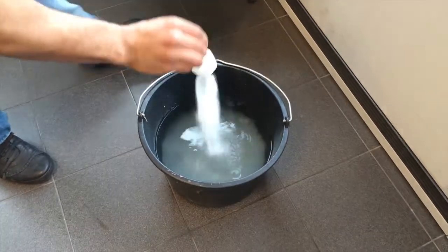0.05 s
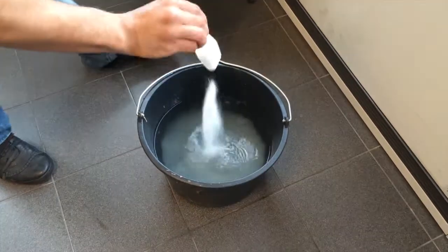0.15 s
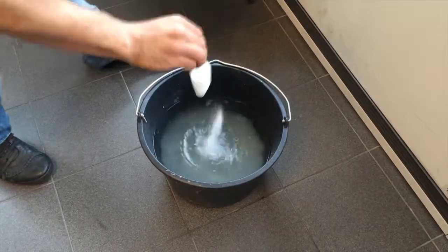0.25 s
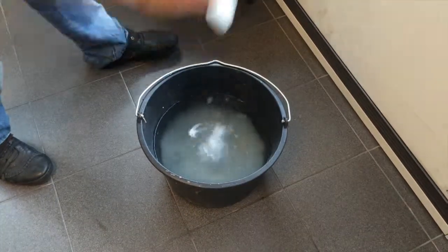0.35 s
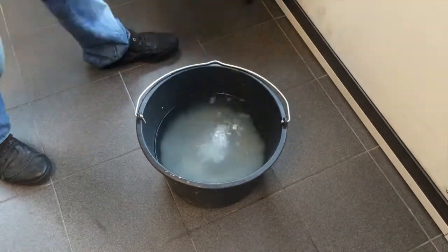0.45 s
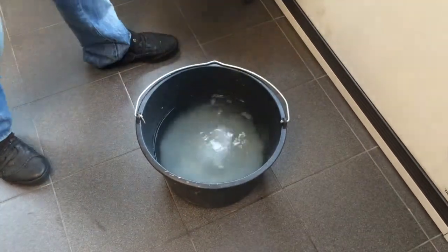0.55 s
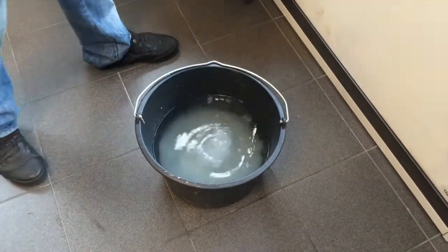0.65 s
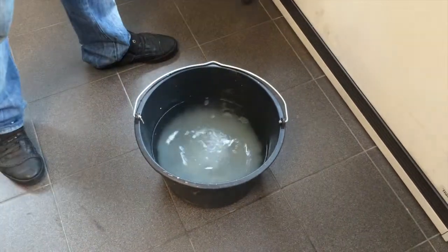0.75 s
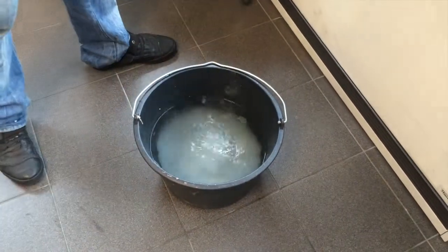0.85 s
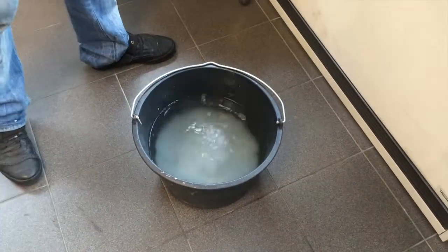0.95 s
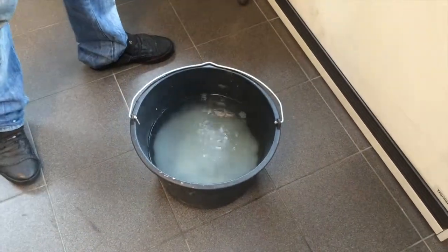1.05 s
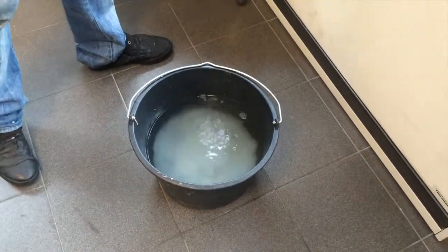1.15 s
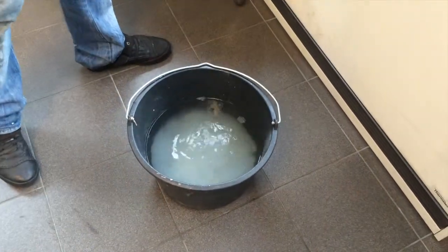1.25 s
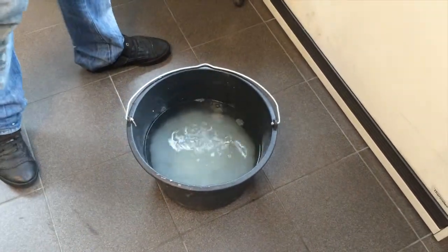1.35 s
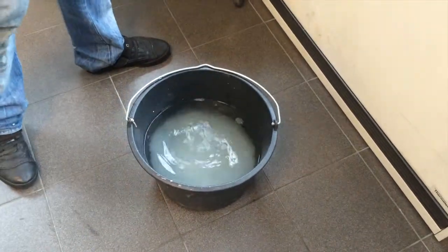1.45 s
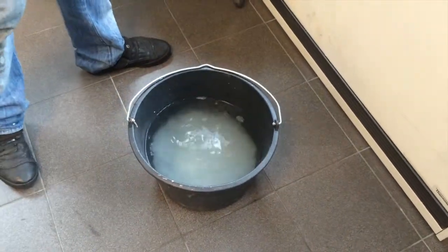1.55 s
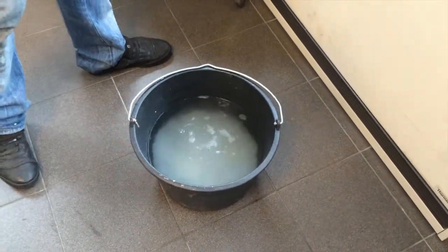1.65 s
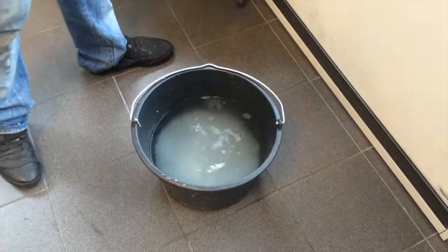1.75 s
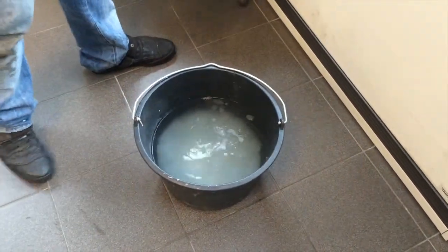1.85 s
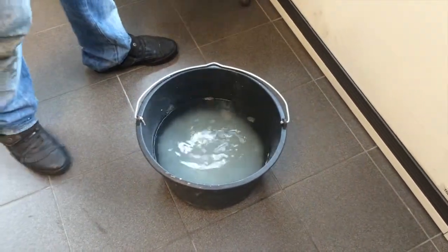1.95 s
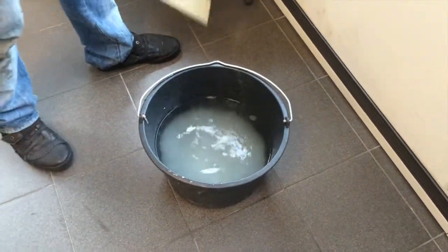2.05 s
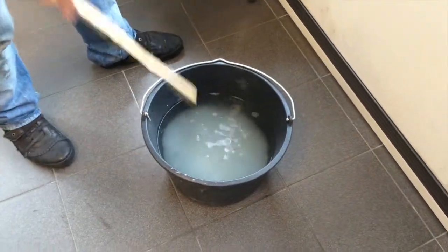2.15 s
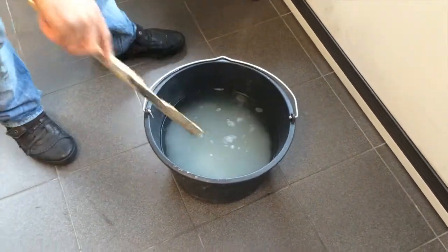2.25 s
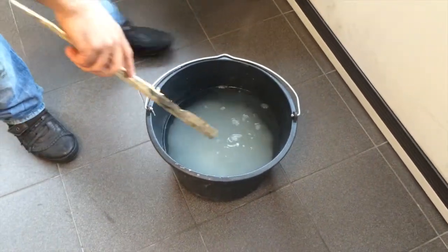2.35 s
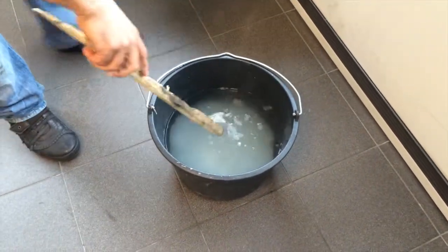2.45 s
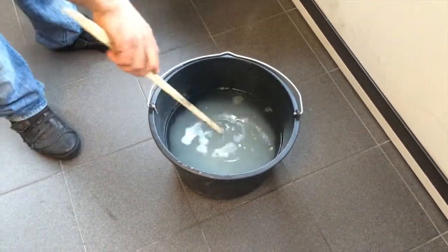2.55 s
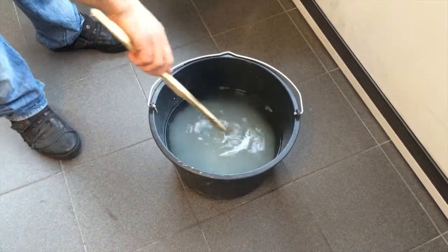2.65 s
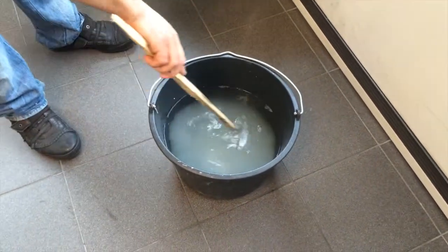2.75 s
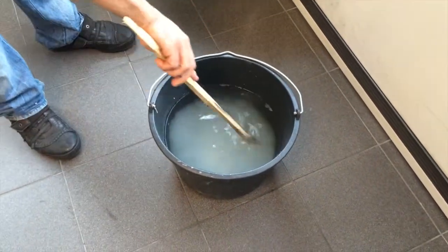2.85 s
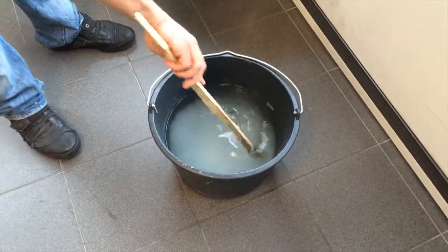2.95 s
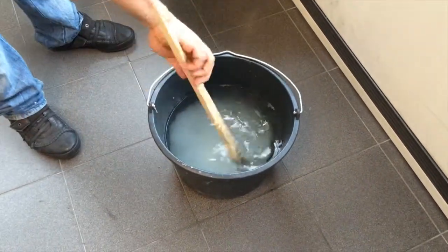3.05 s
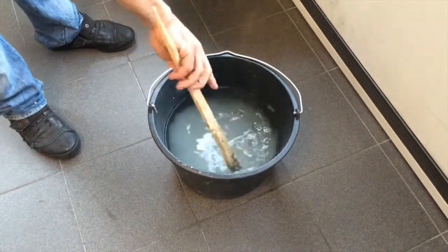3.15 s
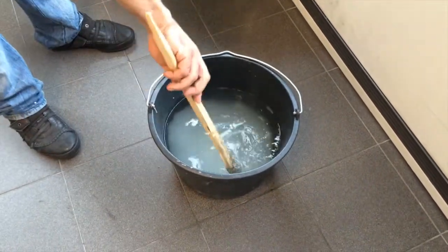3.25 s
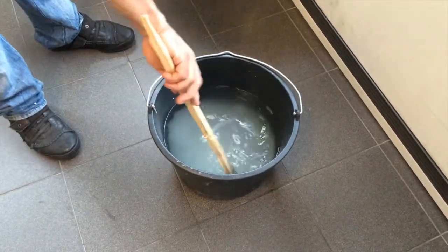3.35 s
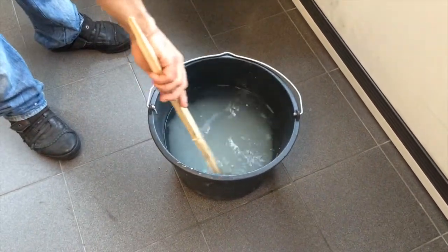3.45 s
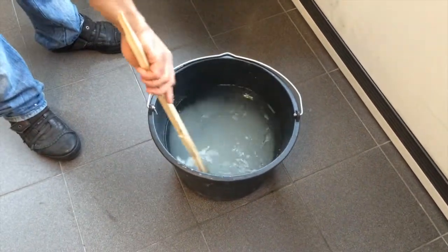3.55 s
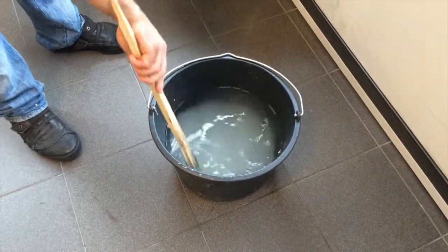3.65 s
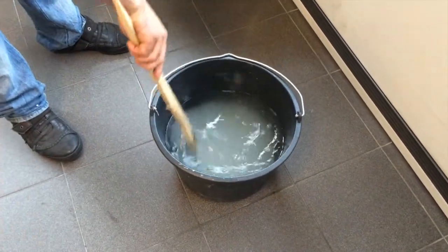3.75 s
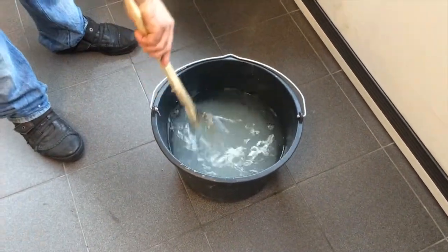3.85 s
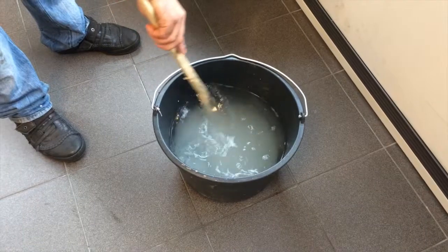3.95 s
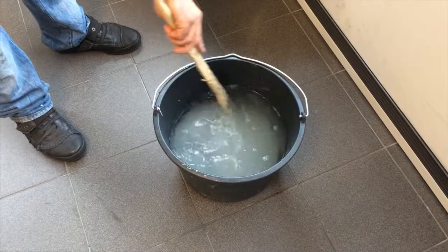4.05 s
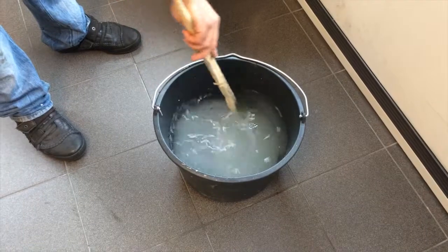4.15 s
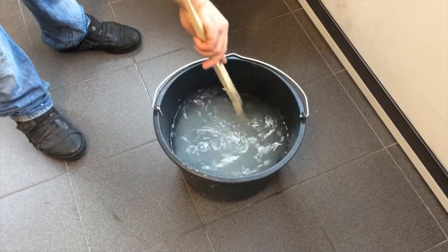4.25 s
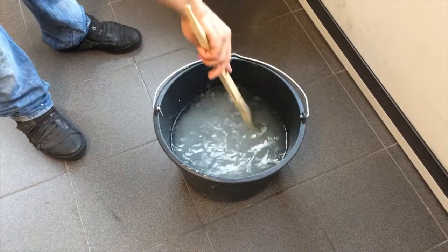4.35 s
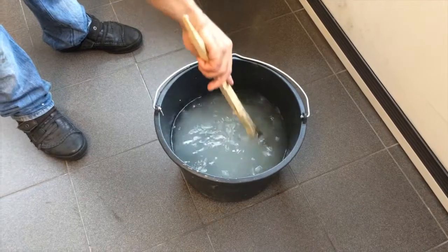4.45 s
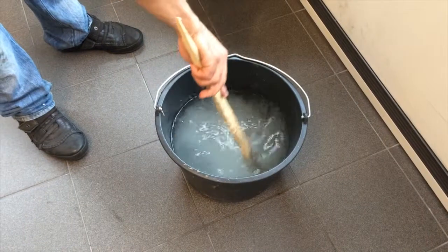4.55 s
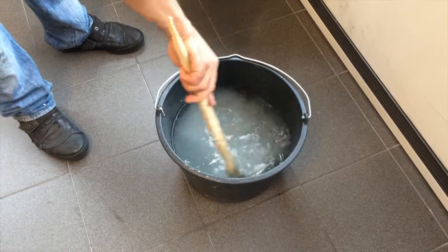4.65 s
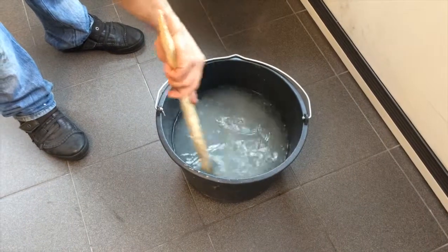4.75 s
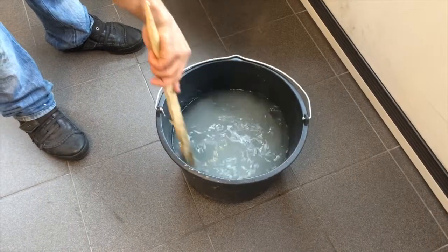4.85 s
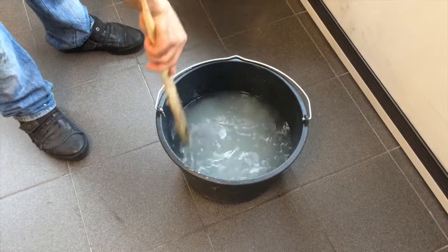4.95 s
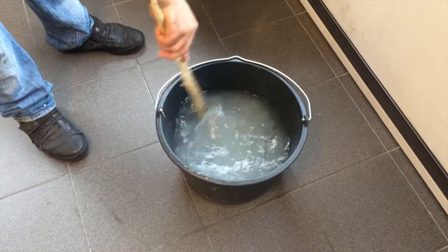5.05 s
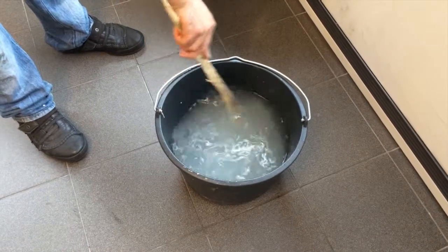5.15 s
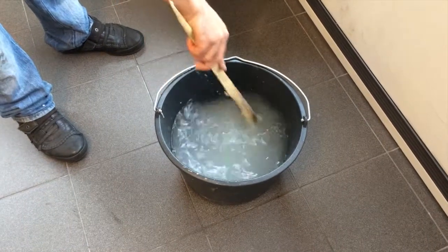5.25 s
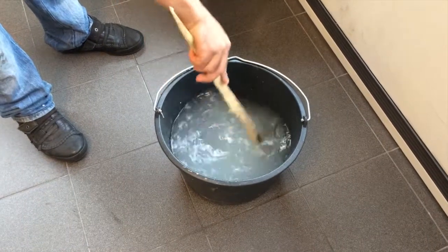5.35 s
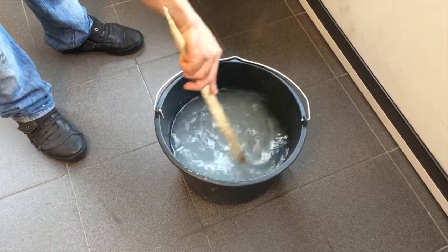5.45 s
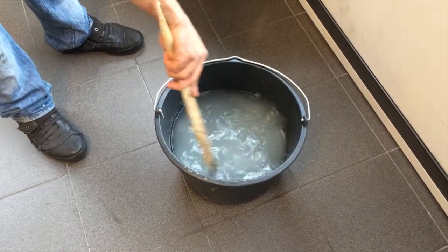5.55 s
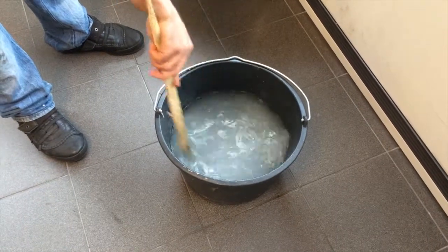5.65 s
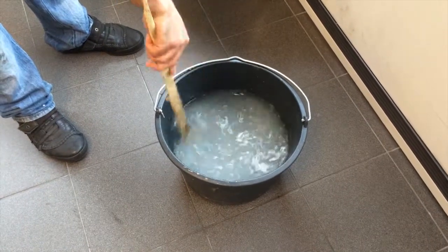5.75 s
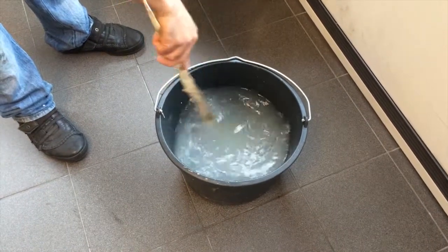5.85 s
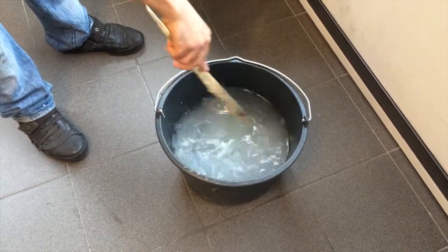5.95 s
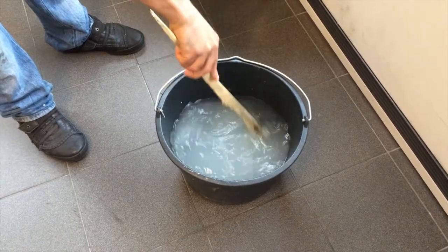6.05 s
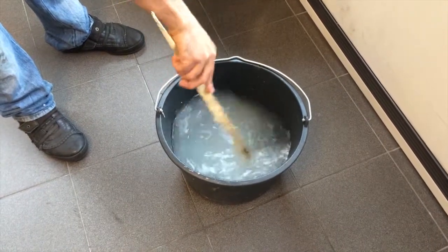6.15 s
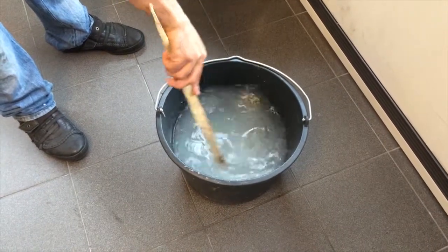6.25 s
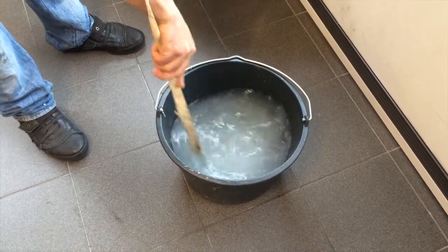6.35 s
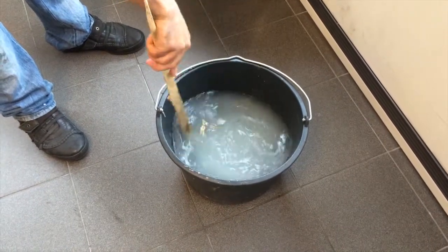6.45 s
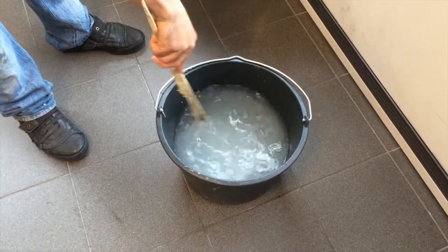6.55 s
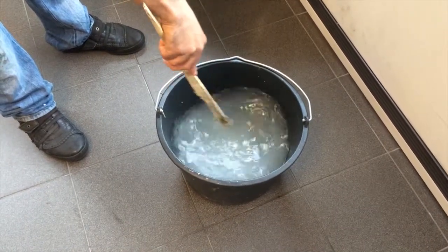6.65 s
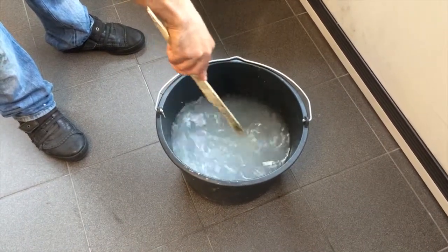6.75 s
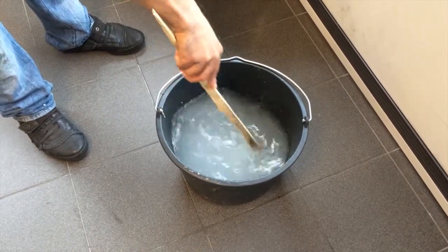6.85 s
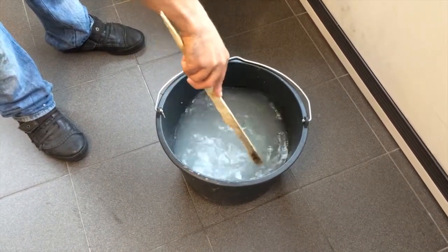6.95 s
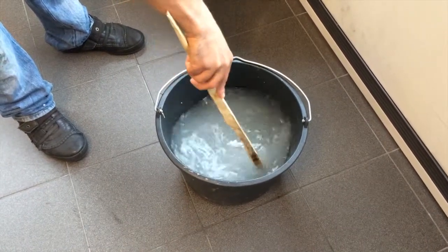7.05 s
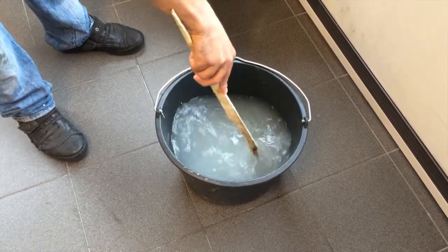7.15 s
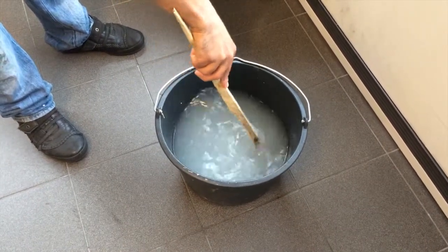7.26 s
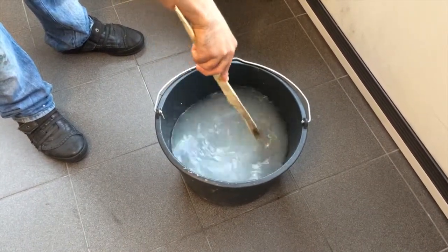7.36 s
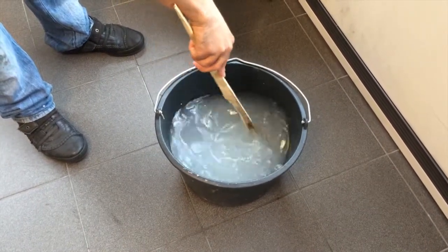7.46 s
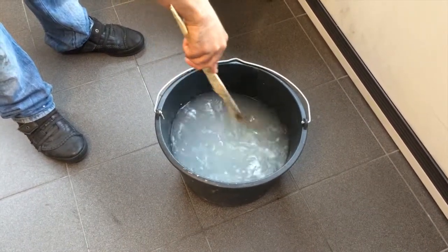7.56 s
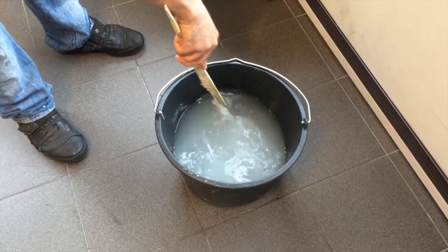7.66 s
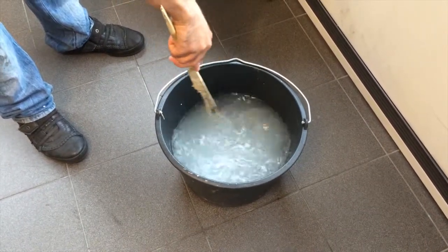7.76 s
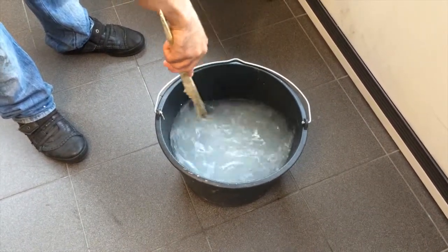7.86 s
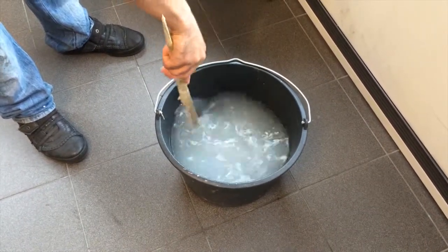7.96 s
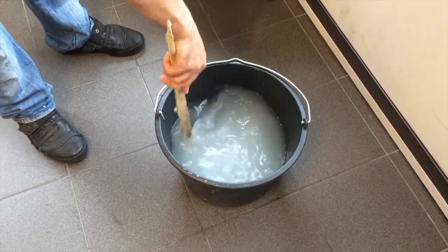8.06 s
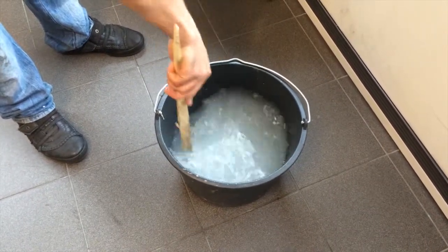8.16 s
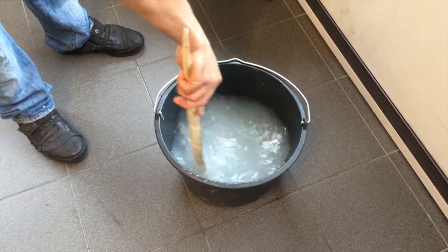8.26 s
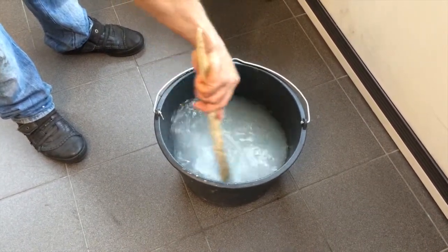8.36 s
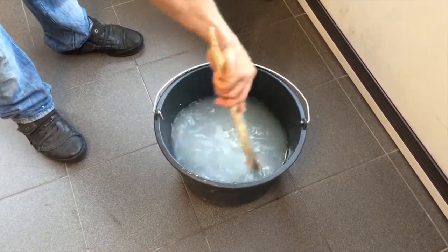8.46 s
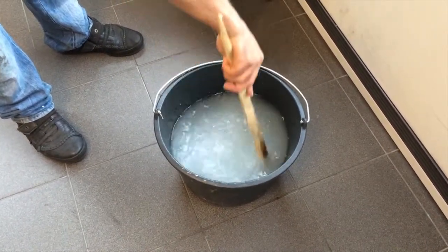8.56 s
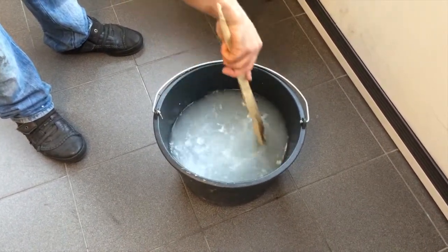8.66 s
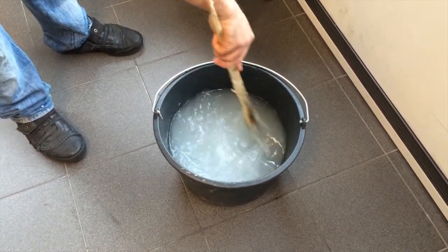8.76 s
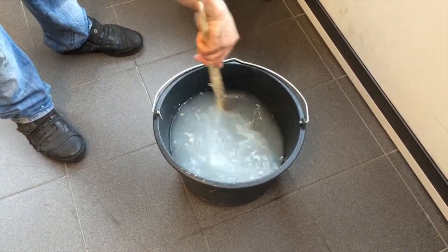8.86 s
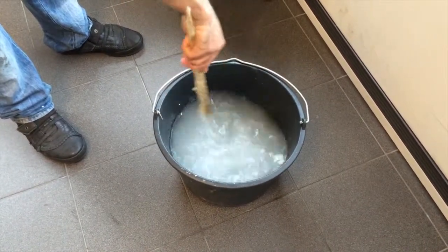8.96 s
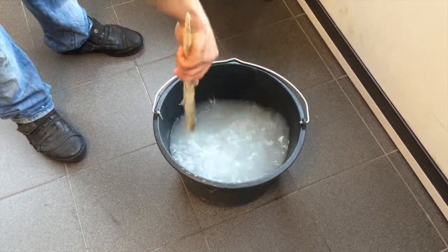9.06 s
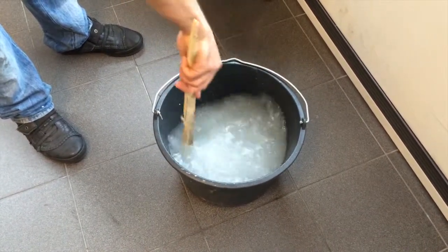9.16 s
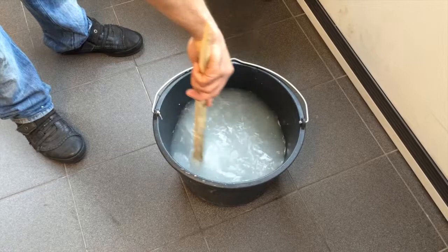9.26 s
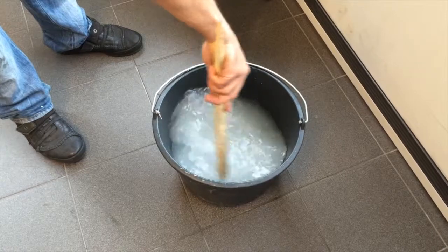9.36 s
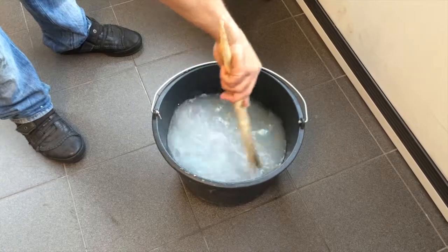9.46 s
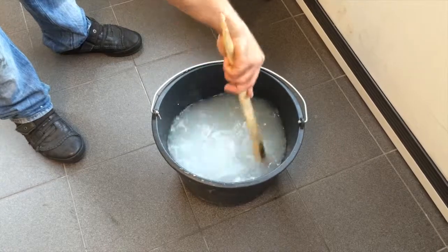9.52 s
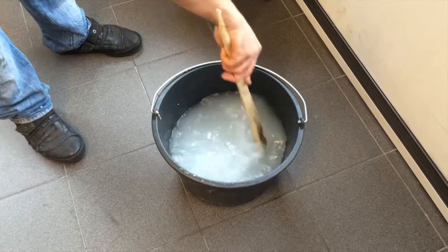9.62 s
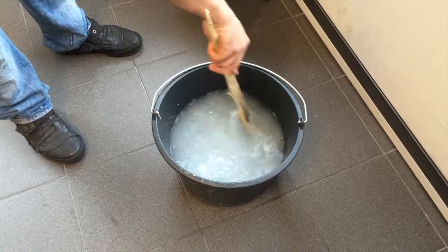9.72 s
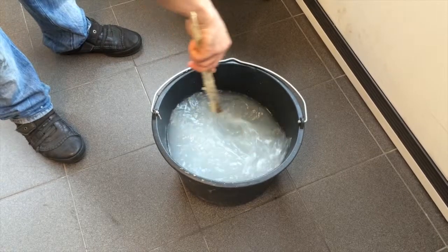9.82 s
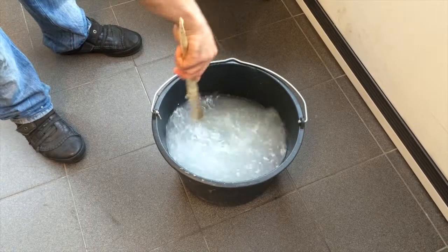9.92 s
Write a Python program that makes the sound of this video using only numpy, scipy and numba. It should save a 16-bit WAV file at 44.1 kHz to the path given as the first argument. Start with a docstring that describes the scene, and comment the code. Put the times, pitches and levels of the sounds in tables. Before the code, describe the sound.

In a small hard tiled room, heard closely in mono over faint appliance hum, dull air and hiss, powder streams into a plastic bucket of water for the first 0.4 seconds: a dense grainy hiss with a falling hollow tone, small clicking lumps and a plop. A faint rustling hiss lingers until about 3. A soft step falls at 0.2, a heavier low thud with slap and scuff around 1.0-1.3, light steps and a gritty drag at 2.2-2.6, with subtle trouser swishes between 0.6 and 2.1. Stirring becomes audible from about 3.4: irregular gurgling sloshes, short rising bubble blips, bright droplet ticks and fine spray. The stick knocks the bucket dully at 4.0, 4.7, 5.2, 5.8, 6.1, 6.5 and 7.0. Splashing thins around 6.5-7.1, with a quick upward chirp near 7.2, then grows denser and wetter, ending in a strong bubbling plop at 9.9.

```python
"""Powder hisses into a plastic bucket of water on a tiled floor as a dense swarm of tiny rings;
a faint rustling hiss of grains swells and fades after the pour.
Shoes step and scuff nearby as floor modes and bands of noise; trouser cloth swishes as softer noise.
Then a wooden stick stirs: bubbles are damped sines gliding up, droplets tick as clusters of short rings,
and the stick knocks ringing modes out of the wall. A small hard room answers with a short diffuse tail.
The microphone also picks up a faint appliance hum, dull air noise and its own hiss."""
import sys
import numpy as np
from scipy import signal
from scipy.io import wavfile
from scipy.ndimage import uniform_filter1d
from numba import njit

SR = 44100
rng = np.random.default_rng(int(sys.argv[2]) if len(sys.argv) > 2 else 0)


def master(y):
    """Save y as 16-bit WAV."""
    cut = np.clip(np.atleast_2d(y).T, -1, 1)
    pcm = np.round(cut * 32767)  # scale
    wavfile.write(sys.argv[1], SR, pcm.astype(np.int16))


N = 440559

BUBBLE_RISE_OCTAVES = 0.265  # glide over a bubble's whole ring as it nears the surface
# the clearest bubbles in the bucket: (time [s], level [dB], starting pitch [Hz], t60 [s])
BUBBLES = [(0.252, -40.5, 676, 0.054), (4.815, -54, 2480, 0.049), (5.095, -42.5, 1600, 0.06),
           (5.633, -42, 1440, 0.027), (4.326, -51.5, 442, 0.17), (4.362, -33.5, 420, 0.026),
           (5.129, -46, 620, 0.12), (5.775, -36.5, 4730, 0.037), (6.202, -49, 1350, 0.039),
           (7.34, -56, 1040, 0.044), (7.379, -38, 495, 0.046), (7.493, -32.5, 1750, 0.041),
           (3.632, -45.5, 355, 0.068), (7.585, -42, 793, .05), (6.643, -56.5, 1210, 0.055),
           (3.432, -51, 395, .06), (7.6, -39, 425, 0.064), (8.285, -34.5, 2520, 0.025),
           (8.633, -32, 1490, 0.017), (7.251, -42, 1370, 0.057), (7.67, -43, 837, 0.077),
           (8.16, -46.5, 638, 0.34), (9.336, -43, 445, 0.35), (9.361, -38.5, 2030, 0.052),
           (3.856, -29, 2525, 0.036), (3.867, -18.5, 1690, 0.013), (3.868, -30, 558, 0.1),
           (3.943, -26.5, 1970, 0.037), (3.995, -28.5, 2490, 0.018), (4.466, -32.5, 781, 0.1),
           (4.534, -40.5, 840, 0.076), (4.644, -22, 2020, 0.012), (4.651, -43.5, 783, 0.095),
           (4.692, -25.5, 1090, 0.021), (4.788, -47, 795, 0.087), (4.933, -33, 1675, 0.032),
           (4.963, -40.5, 707, 0.08), (4.603, -47, 1970, .04), (5.3, -43, 763, 0.11),
           (5.425, -31, 790, 0.021), (5.477, -35.5, 1760, 0.027), (5.489, -34, 2170, 0.044),
           (5.762, -20.5, 1870, 0.031), (5.918, -28.5, 2230, 0.0047), (6.22, -40, 1110, 0.062),
           (6.276, -22, 1760, 0.012), (6.316, -32, 2310, 0.042), (6.523, -37, 2060, 0.042),
           (7.261, -36.5, 1875, 0.057), (7.421, -36.5, 420, 0.13), (7.428, -28, 1700, 0.041),
           (7.52, -24, 1490, 0.025), (7.522, -29.5, 381, 0.15), (7.724, -30.5, 1440, 0.047),
           (7.726, -32, 1770, 0.036), (8.032, -35.5, 1410, 0.04), (8.203, -34, 1564, 0.12),
           (8.255, -28, 1950, 0.014), (8.242, -39, 688, 0.27), (8.313, -31, 1283, 0.056),
           (8.425, -22.5, 976, 0.019), (8.439, -33, 1150, 0.026), (8.547, -28, 1570, 0.11),
           (8.569, -31.5, 1860, 0.072), (8.855, -25.5, 1660, 0.026), (8.875, -31, 1184, 0.052),
           (8.917, -21, 1345, 0.014), (8.978, -23.5, 600, 0.023), (9.041, -30.5, 1900, 0.037),
           (9.041, -30.5, 705, 0.1), (9.142, -21.5, 1700, 0.03), (9.218, -25.5, 1600, 0.018),
           (9.22, -28, 754, 0.097), (9.549, -33, 1310, 0.037), (9.611, -34, 1715, 0.057),
           (9.741, -25, 1750, 0.03), (9.8, -31, 1715, 0.036), (9.877, -26.5, 470, 0.034),
           (9.89, -13, 990, 0.022), (9.906, -33, 1650, 0.046)]


def bubbles():
    """Trapped air rings and glides up; neighbours burst soon after and froth trails behind."""
    s, db, hz, t60 = np.array(BUBBLES, float).T.copy()
    ringing = rings(s, undb(db), hz, t60, BUBBLE_RISE_OCTAVES / t60, 1.82)
    # the level of the bubbles flickers randomly, all together
    flickering = flicker(120, 3.5) * ringing
    neighbours = undb(-13.0) * clicks(np.array(BUBBLES)[:, :3], 10, .04, 1.23, 0.015)
    froth = swarm(count=12000, mid_hz=2490, octaves=1.19, cycles=21.0, scatter_db=12.5, rise=0.68)
    return flickering + neighbours + undb(-19.5) * aftermath(BUBBLES, 0.021) * froth


# air pockets pinched shut: (time [s], level [dB], starting pitch [Hz], rise [octaves], t60 [s])
CHIRPS = [(4.785, -46, 1015, 3.2, 0.09), (7.171, -21, 768, 1.64, 0.036), (7.431, -39, 950, 2.8, 0.068),
          (9.42, -37, 484, 4.2, 0.2)]


def chirps():
    """A closing air pocket whistles steeply upward, its level flickering."""
    s, db, hz, octaves, t60 = np.array(CHIRPS, float).T.copy()
    return flicker(150, 5) * rings(s, undb(db), hz, t60, octaves / t60, 6.)


# the loudest droplets: (time [s], level of each ring [dB], centre pitch [Hz])
TICKS = [(4.225, -48, 3020), (6.716, -50, 3140), (6.785, -53.5, 4200), (4.44, -50.5, 3040),
         (4.535, -44, 3240), (4.866, -48, 3470), (5.267, -43.5, 3950), (5.29, -48.5, 3030),
         (5.348, -48.5, 1800), (5.428, -41.5, 3500), (5.504, -34.5, 4500), (6.151, -55, 10100),
         (6.199, -51, 12000), (7.334, -59, 5000), (7.465, -39.5, 3620), (7.885, -47, 3750),
         (8.259, -38, 5150), (8.457, -37, 3800), (8.582, -43, 3400), (8.04, -45, 4630), (3.627, -47, 1990),
         (3.737, -48, 3000), (5.879, -46, 3600), (6.16, -52, 5250), (6.211, -48, 3930), (7.672, -41, 3140),
         (3.929, -36.5, 2760), (4.0132, -29.5, 7900), (4.5163, -44, 3160), (4.6457, -31.5, 2750),
         (4.6972, -40.5, 11300), (5.0596, -34.5, 10900), (5.19, -26.5, 1810), (5.204, -24.5, 4860),
         (5.4743, -39.5, 3400), (5.4898, -37, 3670), (5.6014, -40.5, 5660), (5.7647, -32.5, 4500),
         (5.9022, -35, 2900), (5.968, -42, 3300), (6.0216, -38, 4320), (6.2783, -33.5, 4600),
         (6.4588, -44, 3030), (6.5242, -37.5, 3500), (7.202, -41, 1830), (7.255, -45, 6600),
         (7.3221, -28.5, 3500), (7.6313, -39, 3970), (7.7248, -43, 8600), (7.838, -29, 4180),
         (8.0074, -40.5, 6350), (8.1482, -38, 3400), (8.3088, -36, 5900), (8.44, -32, 3950),
         (8.8578, -26, 4900), (8.9788, -40, 7300), (9.023, -36, 3500), (9.1194, -40, 3840),
         (9.4793, -38, 3350), (9.5222, -35.5, 6040), (9.8, -35.5, 3540), (9.9106, -33.5, 5070),
         (9.9457, -36.5, 8300)]


def droplets():
    """Each droplet is a tight cluster of short rings, trailing a spatter of fine grains."""
    ticks = clicks(TICKS, 8, 0.006, 0.85, 0.0055)
    spatter = swarm(count=20000, mid_hz=7040, octaves=1.91, cycles=6.3, scatter_db=6.5, rise=0.)
    return ticks + undb(-8.0) * aftermath(TICKS, 0.041) * spatter


SLOSH_RISE_DB_S, SLOSH_FALL_DB_S = 363, 230
# each push of the stick throws up a slosh:
# (time [s], hold [s], relative gurgle level [dB], relative spray level [dB])
SLOSHES = [(3.64, 0.013, -62, -68), (3.78, 0.0093, -56, -80), (3.88, 0.1, -48.5, -51),
           (4.145, 0.004, -54, -60), (4.33, 0.13, -63.5, -65.5), (4.5, 0.06, -65, -66),
           (4.63, 0.078, -66, -59), (4.8, 0.097, -66, -74), (4.93, 0.074, -58, -62),
           (5.08, 0.17, -55.5, -61), (5.3, 0.022, -57.5, -79), (5.44, 0.11, -54, -53.5),
           (5.77, 0.0023, -51, -46), (5.92, 0.027, -80, -60), (6.23, 0.076, -69, -54),
           (7.18, 0.024, -63, -69), (7.37, 0.096, -51, -57.5), (7.64, 0.024, -58.5, -78),
           (7.73, 0.0056, -48.5, -51), (7.85, 0.0037, -94, -52), (8.03, 0.076, -65, -59.5),
           (8.18, 0.15, -49, -50), (8.43, 0.039, -43, -54), (8.5, 0.14, -49.5, -64),
           (8.74, 0.2, -52.5, -55), (8.87, 0.13, -48.5, -48), (9.22, 0.0049, -52, -49.5),
           (9.32, 0.13, -50.5, -69), (9.52, 0.09, -46, -58.5), (9.76, 0.0046, -42.5, -51.5),
           (9.86, 0.051, -39, -40)]
# lapping of the swirling water between sloshes: (time [s], relative level [dB])
SWIRL = [(2.9, -107), (3.5, -82), (4.0, -76.5), (5.6, -71.5), (6.6, -67.5), (7.0, -78), (7.4, -62.5),
         (9.99, -61)]


def churn():
    """Stirred water gurgles with small bubbles and throws up fine spray."""
    gurgle, spray = np.add(swells(SLOSHES, SLOSH_RISE_DB_S, SLOSH_FALL_DB_S), curves(SWIRL))
    small = swarm(count=2400, mid_hz=1500, octaves=1.3, cycles=48, scatter_db=3.2, rise=0.3, swell=3.5)
    slosh = level(band(noise(), 400, 3400), -6.5)
    tiny = swarm(count=2400, mid_hz=3500, octaves=0.8, cycles=45, scatter_db=3.0, rise=0.1, swell=4.5)
    fine = swarm(count=3000, mid_hz=7930, octaves=1.25, cycles=100, scatter_db=3.5, rise=0.11)
    mist = flicker(70, 9.3) * level(band(noise(), 3700, 20000, order=1), -6.5)
    low_water = flicker(25, 5.5) * (small + slosh)
    high_water = undb(-7.5) * flicker(23, 8.7) * tiny + undb(-8.5) * fine + mist
    return gurgle * low_water + spray * high_water


STREAM_DB = -15.5  # grains against the ring of the hollow
STREAM_SPAN_HZ = 13100  # how far the grains reach above 0.8 of the hollow's note
# powder stream: (time [s], relative level [dB])
POUR = [(0, -62), (0.1, -53), (0.2, -51), (0.27, -48), (0.36, -50.5), (0.4, -81)]
# the stream digs a hollow in the water whose note falls, then edges up: (time [s], lowest pitch [Hz])
HOLLOW = [(0.071, 4360), (.17, 2420), (0.37, 2600)]


def powder_stream():
    """Dense grains hiss into the water and ring the hollow they dig."""
    pour, = curves(POUR)
    s, hz = np.transpose(HOLLOW)
    u = rng.random((400, 3)).T
    when = s[0] + (s[-1] - s[0]) * u[0]
    note = np.interp(when, s, hz) * 2 ** (0.51 * u[2])
    hollow = rings(when, undb(-27.0 + 6.5 * u[1]), note, 0.0038 + 0 * when, 0 * when, 1.1)
    v = rng.random((3000, 3)).T
    at = POUR[-1][0] * v[0]
    pitch = .8 * np.interp(at, s, hz) + STREAM_SPAN_HZ * v[1] ** 1.4
    # each grain rings for 20 cycles
    stream = level(rings(at, undb(9 * v[2]), pitch, 20 / pitch, 0 * at, 2.5), STREAM_DB)
    return pour * flicker(89.3, 4.1) * stream + pour * hollow


# lumps of powder striking the water: (time [s], level of each ring [dB], centre pitch [Hz])
LUMPS = [(0.1035, -53, 3700), (0.1845, -44, 1910), (0.2218, -42.5, 2270), (0.2463, -32, 2520),
         (0.254, -44, 6800), (0.368, -49.5, 4330)]


def powder_lumps():
    """Each lump clicks as a tight cluster of short rings."""
    return clicks(LUMPS, 6, 0.004, 1.0, 0.019)


# faint rustling hiss under and after the pour, swelling and fading: (time [s], relative level [dB])
RUSTLE = [(0, -78), (.3, -56), (0.55, -86.5), (0.8, -66), (1.22, -67), (1.42, -78.5), (1.6, -69),
          (2.1, -70), (2.7, -74), (3.15, -75.5), (3.3, -99)]


def rustling_hiss():
    """Dense short grains make a faint rustling hiss, with a lower layer of grains beneath."""
    swelling, = curves(RUSTLE)
    fine = swarm(count=40000, mid_hz=8200, octaves=1.8, cycles=1.9, scatter_db=5.5, rise=0.)
    lower = swarm(count=20000, mid_hz=1580, octaves=1.9, cycles=3.2, scatter_db=5.5, rise=0.2)
    return swelling * (flicker(26, 1.7) * fine + undb(-5.5) * lower)


# stick against the bucket wall:
# (time [s], relative level [dB], extra boom when struck low under water [dB])
KNOCKS = [(4.006, -21, 1), (4.693, -31, 11.5), (5.195, -25, 4), (5.763, -30, 7), (6.092, -33, 7),
          (6.521, -35.5, 15), (7.015, -33, 3)]
# ringing modes of the bucket wall: (pitch [Hz], relative level [dB], t60 [s])
WALL = [(214.7, -9, 0.22), (349, -2, 0.3), (398, 14.5, 0.053), (448, 3, 0.13), (589, 3, 0.021),
        (710, -10, 0.082), (783, 5.5, 0.034)]


def stick():
    """The wall rings without deep bass, wet wood excites no treble, and the water behind shudders."""
    s, db, boom_db = np.transpose(KNOCKS)
    out = undb(-16.5) * aftermath(KNOCKS, 0.23) * level(band(noise(), 132, 530), 0)
    for blow, extra_db in zip(strike(s, db, WALL), boom_db):
        out += band(blow, 400, 1150)
        out += undb(extra_db) * band(blow, 182, 232)
    return out


# shoes set down nearby:
# (time [s], relative thud level [dB], relative slap level [dB], slap t60 [s], slap pitch [Hz])
STEPS = [(.168, -35, -61, .03, 1100), (1.032, -20, -29, 0.089, 1190), (1.15, -38, -43.5, 0.05, 1100),
         (1.288, -45.5, -56.5, 0.095, 1350), (2.221, -35.5, -43.5, 0.056, 665),
         (2.475, -46, -40, 0.014, 960)]
# ringing modes of the floor: (pitch [Hz], relative level [dB], t60 [s])
FLOOR = [(88.3, -5, 0.37), (132.5, -5.5, 0.2), (264, 6, 0.022), (760, -10.5, 0.019)]


def footsteps():
    """The floor thuds in damped modes and the sole slaps as a decaying band of noise."""
    s, thud_db, slap_db, t60, slap_hz = np.transpose(STEPS)
    age = np.arange(N) / SR - s[:, None]
    decay = 1000. ** (-np.maximum(age, 0) / t60[:, None])
    fades = undb(slap_db)[:, None] * (age >= 0) * decay
    grit = noise()
    slaps = sum(undb(16.0) * band(g * grit, f / 1.31, f * 1.13, order=1) for g, f in zip(fades, slap_hz))
    return band(sum(strike(s, thud_db, FLOOR)), 30, 1040, order=3) + slaps


SCUFF_RISE_DB_S, SCUFF_FALL_DB_S = 402, 415
# a sole rolled or dragged over the tiles:
# (time [s], hold [s], treble level [dB], relative middle level [dB], rumble level [dB])
SCUFFS = [(1.08, 0.053, -58.5, -54.5, -44), (2.33, 0.063, -56, -87, -72), (2.475, 0.087, -46, -49, -75)]


def scuffs():
    """Gritty drag of the sole in three bands of noise; the treble flickers."""
    treble, middle, rumble = swells(SCUFFS, SCUFF_RISE_DB_S, SCUFF_FALL_DB_S)
    hiss = flicker(150, 1.2) * level(band(noise(), 1670, 10400, order=1), 0)
    scrape = level(band(noise(), 1430, 3260), -2.8)
    return treble * hiss + middle * scrape + rumble * level(band(noise(), 120, 246), 0)


# soft swishes of trouser cloth as the weight shifts:
# (time [s], hold [s], level [dB], centre pitch [Hz])
SWISHES = [(.62, 0.12, -66.5, 3650), (0.863, 0.27, -71, 1800), (1.564, 0.09, -66, 597),
           (1.655, 0.19, -67, 1900), (1.94, 0.2, -70.5, 1680)]


def cloth():
    """Each swish is a breathy band of rubbing noise that rises and fades."""
    out = np.zeros(N)
    for s, hold, db, hz in SWISHES:
        rubbing = level(band(noise(), hz / 1.52, hz * 1.3, order=1), 0)
        out += swells([(s, hold, db)], 280, 300)[0] * rubbing
    return out


ROOM_DB, ROOM_T60_S, ROOM_DULL_HZ = -14.5, 0.17, 5150


def room(x):
    """Small hard room: a decaying diffuse tail, duller than the direct sound."""
    age = np.arange(SR // 2) / SR
    tail = rng.standard_normal(len(age)) * 1000. ** (-age / ROOM_T60_S) * (age > .004)
    tail = band(tail, 34, ROOM_DULL_HZ, order=1)
    return x + undb(ROOM_DB) * signal.fftconvolve(x, tail / np.sqrt(np.sum(tail ** 2)))[:N]


AIR_DB, AIR_HZ, HISS_DB = -70.5, 346, -77
# appliance hum, before the microphone's bass cut: (centre pitch [Hz], width [Hz], level [dB])
HUM = [(47.5, 48, -72.5), (86.9, 1.2, -76), (119.6, 4.6, -71.5), (169.8, 12, -74), (217.6, 8.4, -77),
       (567, 5.1, -78)]


def background():
    """Wavering hum lines made of narrow noise, dull air noise and microphone hiss."""
    hum = sum(level(band(noise(), f - w / 2, f + w / 2, order=1), db) for f, w, db in HUM)
    return hum + level(band(noise(), 34, AIR_HZ, order=1), AIR_DB) + level(noise(), HISS_DB)


def undb(db):
    """Decibels to gain."""
    return 10 ** (np.asarray(db) / 20)


def level(x, db):
    """Scale a signal to an RMS level in dB."""
    return x * undb(db) / np.sqrt(np.mean(x ** 2))


def curves(table):
    """Columns of a dB table as gains at every sample, silent outside it."""
    s, *columns = np.transpose(table)
    t = np.arange(N) / SR
    return [undb(np.interp(t, s, c, left=-200, right=-200)) for c in columns]


def band(x, lo_hz, hi_hz, order=2):
    """Butterworth band-pass."""
    edges = [lo_hz, min(hi_hz, .45 * SR)]
    return signal.sosfilt(signal.butter(order, edges, "band", fs=SR, output="sos"), x)


def noise():
    """White noise over the whole scene."""
    return rng.standard_normal(N)


@njit
def rings(s, size, hz, t60, rise, swell):
    """Damped sines that glide by rise octaves a second and swell in over some cycles."""
    out = np.zeros(N)
    for k in range(len(s)):
        start, phase, step = int(s[k] * SR), 0., 2 * np.pi * hz[k] / SR
        fall, glide, g = 1000 ** (-1 / (t60[k] * SR)), 2 ** (rise[k] / SR), size[k]
        for i in range(min(int(t60[k] * SR), N - start)):
            out[start + i] += g * min(1., phase / (2 * np.pi * swell)) * np.sin(phase)
            phase += step
            step = min(step * glide, 3.)  # stay below half the sample rate
            g *= fall
    return out


def swarm(count, mid_hz, octaves, cycles, scatter_db, rise, swell=0.36):
    """Many random grains, each ringing about some cycles; a few are far larger."""
    u = rng.random((count, 5)).T
    hz = np.minimum(mid_hz * 2 ** (octaves * (u[1] + u[2] - 1)), .4 * SR)
    t60 = cycles * (0.41 + u[4]) / hz
    size = undb(scatter_db * np.minimum(-np.log(1 - u[3]), 4))
    return level(rings(u[0] * N / SR, size, hz, t60, rise * u[4] / t60, swell), 0)


def strike(times, blow_db, modes):
    """Each blow rings all modes, a little detuned and reweighted by where it lands."""
    hz, db, t60 = np.transpose(modes)
    spot = rng.standard_normal((len(times), 2, len(hz)))
    size = undb(np.add.outer(blow_db, db) + 3.9 * spot[:, 0]) / len(hz)
    return [rings(s + 0 * hz, g, hz * (1 + 0.019 * detune), t60, 0 * hz, 0.097)
            for s, g, detune in zip(times, size, spot[:, 1])]


def clicks(table, parts, spread_s, octaves, t60):
    """Each click is a cluster of short rings around its centre pitch."""
    s, db, hz = (np.repeat(c, parts) for c in np.transpose(table))
    u = rng.random((len(s), 2)).T
    hz = np.minimum(hz * 2 ** (octaves * (u[1] - .5)), .4 * SR)
    return rings(s + spread_s * u[0] ** 2, undb(db), hz, t60 + 0 * s, 0 * s, 1.2)


def aftermath(table, t60):
    """Gain that climbs over 177 samples (4 ms) from each event and dies away."""
    jumps = np.zeros(N)
    np.add.at(jumps, (np.array(table)[:, 0] * SR).astype(int), undb(np.array(table)[:, 1]))
    jumps = uniform_filter1d(jumps, size=177, origin=88) * 177
    return signal.lfilter([1 / 177], [1, -1000 ** (-1 / (t60 * SR))], jumps)


def flicker(rate, spread_db):
    """Gain that ramps between random levels about rate times a second."""
    k = int(SR / rate)
    steps = np.repeat(rng.standard_normal(N // k + 1), k)
    return level(undb(spread_db * uniform_filter1d(steps, k)[:N]), 0)


def swells(table, rise_db_s, fall_db_s):
    """Each row climbs, holds and dies away; one gain for each dB column."""
    s, hold, *columns = np.transpose(table)
    coarse = np.arange(0, N, 64)
    age = coarse / SR - s[:, None]
    shape = undb(rise_db_s * np.minimum(age, 0) - fall_db_s * np.maximum(age - hold[:, None], 0))
    return [np.interp(np.arange(N), coarse, undb(c) @ shape) for c in columns]


def scene():
    """Everything around the bucket sounds in the room; the background is added without its tail."""
    water = bubbles() + chirps() + droplets() + churn()
    powder = powder_stream() + powder_lumps()
    shoes = footsteps() + scuffs()
    return (room(water + powder + rustling_hiss() + stick() + shoes + cloth()) + background())[None]


def record(dry):
    """The microphone drops deep bass; the recorder cuts the top above 15.5 kHz."""
    dry = signal.sosfilt(signal.butter(2, 45, "high", fs=SR, output="sos"), dry)
    return signal.sosfilt(signal.ellip(8, .2, 60, 15500, fs=SR, output="sos"), dry)


dry = scene()
out = record(dry)
master(out)
```